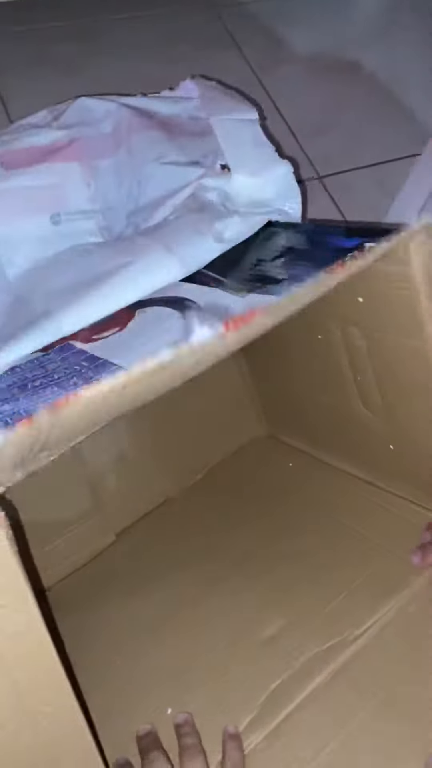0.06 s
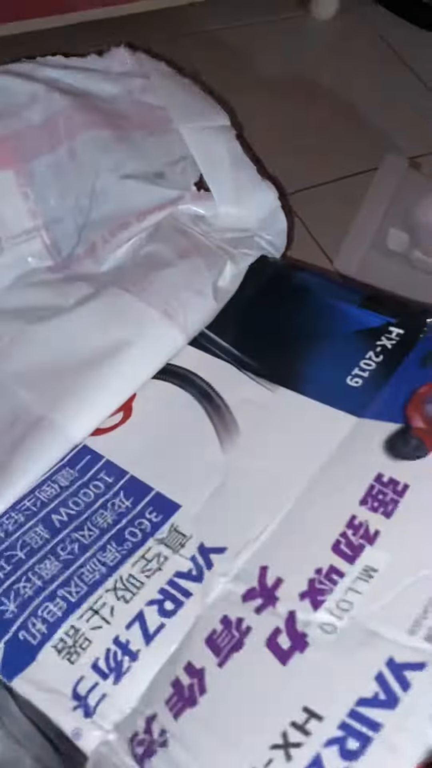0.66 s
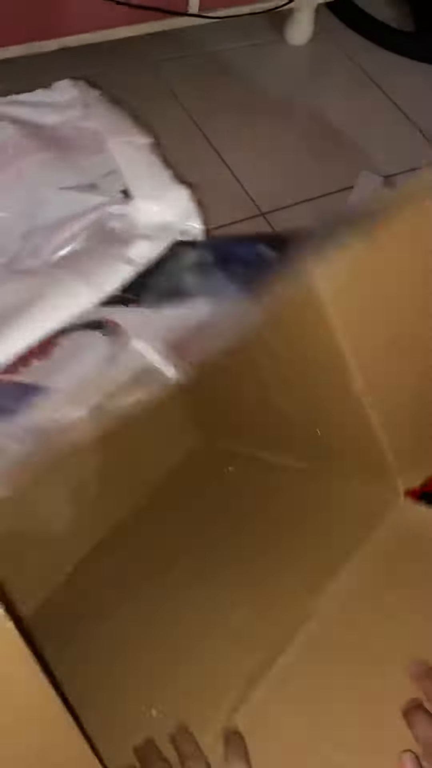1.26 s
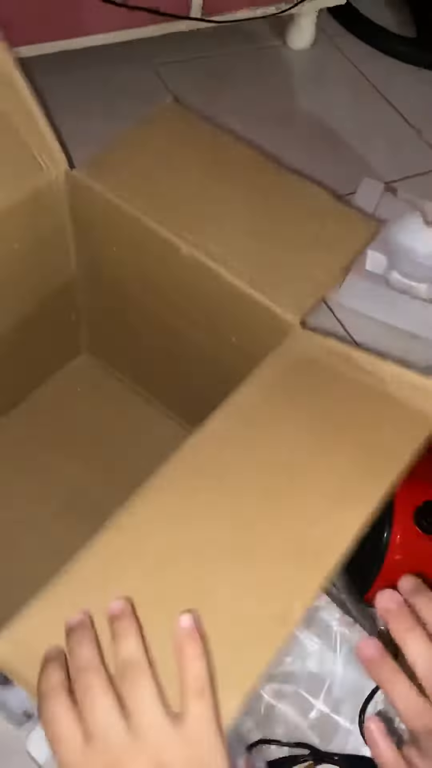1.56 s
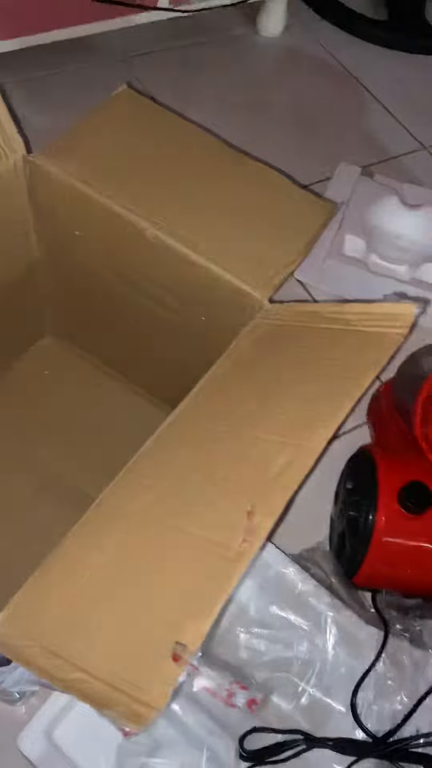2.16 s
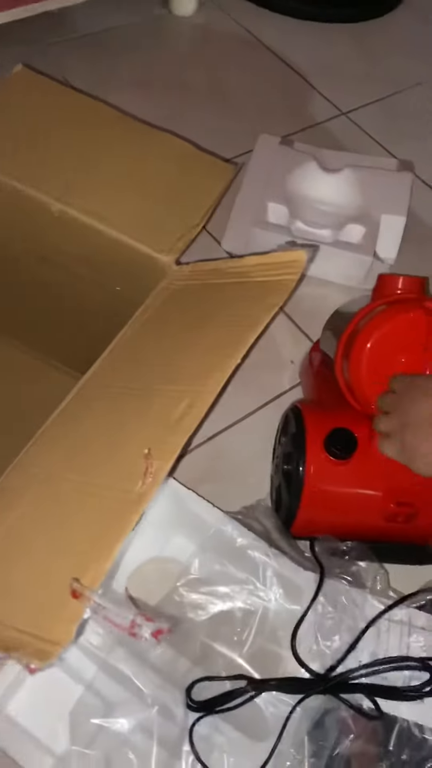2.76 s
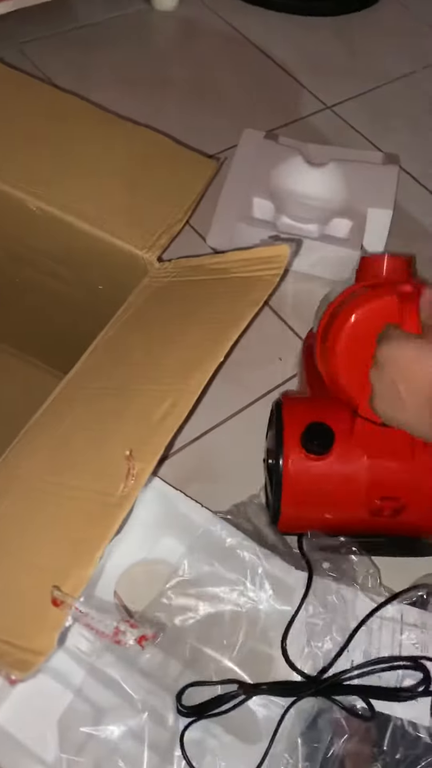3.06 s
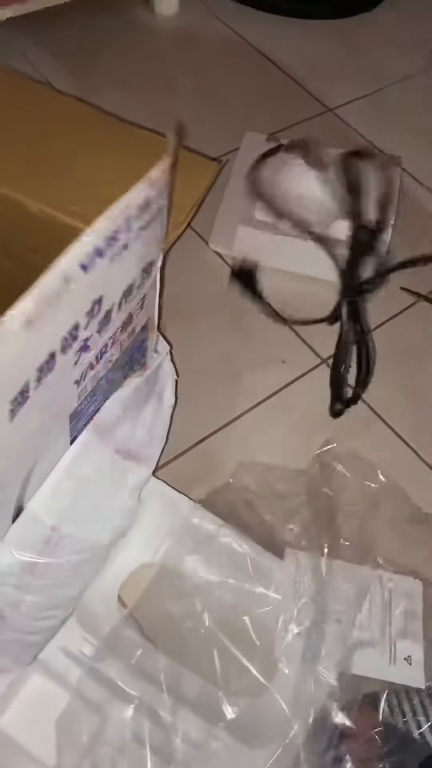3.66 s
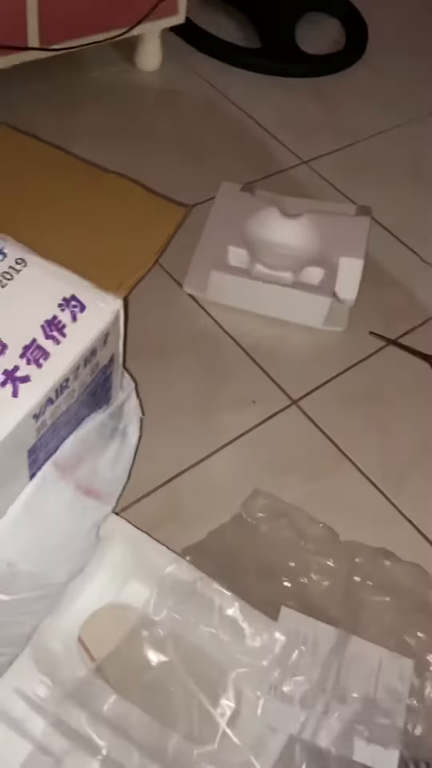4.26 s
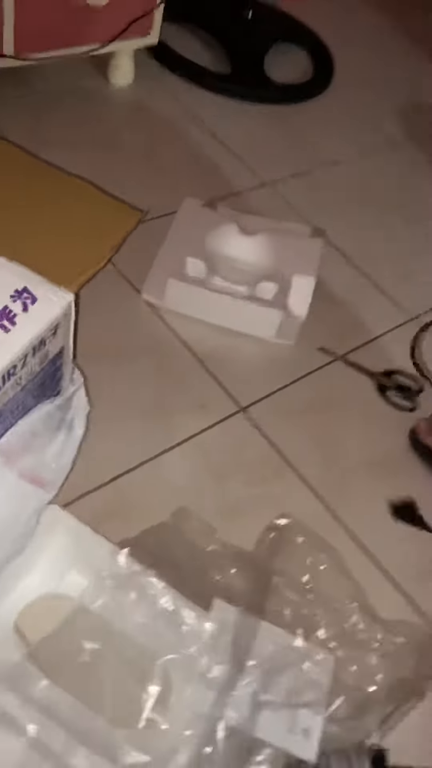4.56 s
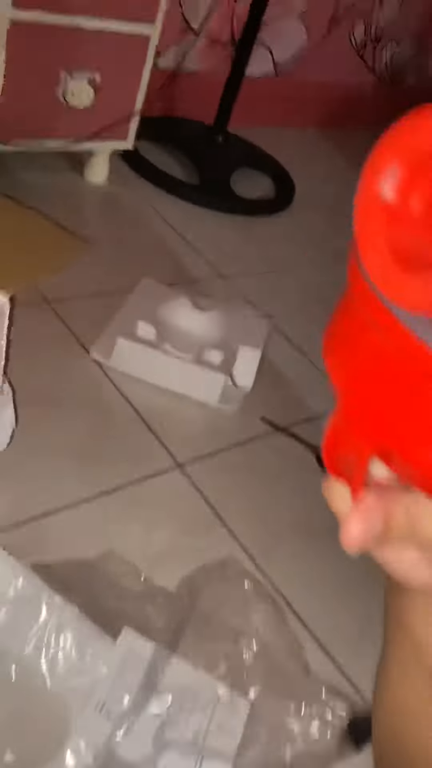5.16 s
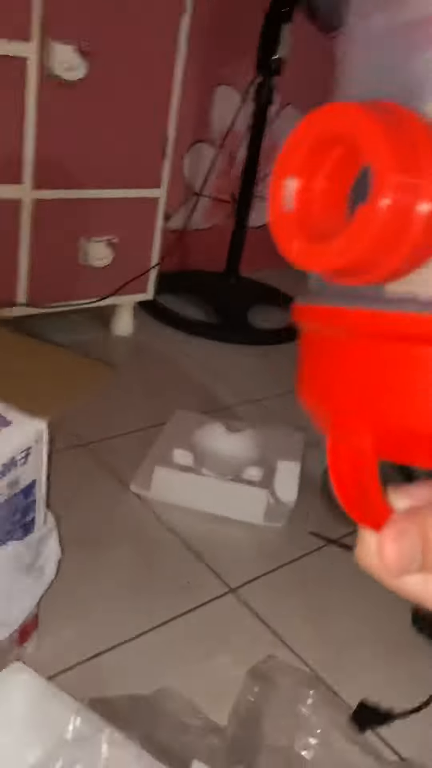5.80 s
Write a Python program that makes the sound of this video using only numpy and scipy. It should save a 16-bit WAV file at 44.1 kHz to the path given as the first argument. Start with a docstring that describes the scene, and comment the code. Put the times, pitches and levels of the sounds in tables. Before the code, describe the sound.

A low motor hum, probably an air conditioner, runs for the whole six seconds, throbbing nearly four times a second with a faint buzz and a steady rush of air. Over it come light, close unpacking noises with the short echo of a small tiled room. In the first second a cardboard flap slides softly, with a few small taps and ticks. From about 1.3 seconds cardboard scrapes, ending in a quick cluster of hollow box knocks at 1.5. After a lull, a plastic vacuum cleaner body taps near 3 seconds, and packing film crinkles with bright snaps until about 3.6, with another box knock at 3.5. Around 4 seconds the box thumps twice more amid further crinkling. Two faint taps follow at about 4.5 and 4.8 seconds, then only the throbbing hum and fan remain.

```python
"""A low, throbbing hum fills a tiled room while someone unpacks a vacuum cleaner on the floor.
The hum is a motor, probably an air conditioner's, that slips a little behind the mains and so throbs.
Its fan blows steadily, and every turn puffs out some hiss. Over this, cardboard flaps slide and knock,
packing film crinkles as it buckles, and the cleaner's plastic body taps as it is lifted."""
import sys
import numpy as np
from scipy import signal
from scipy.fft import rfft, irfft
from scipy.io import wavfile
from scipy.ndimage import uniform_filter1d

SR = 44100
rng = np.random.default_rng(int(sys.argv[2]) if len(sys.argv) > 2 else 0)


def dump_mix(stems):
    """Bounce the given channels to the path in sys.argv[1] as a 16-bit WAV at rate SR."""
    frames = np.atleast_2d(stems).T  # one column per channel
    limited = np.clip(frames, -1, 1)  # hard clip at full scale
    pcm = np.round(limited * 32767).astype(np.int16)
    wavfile.write(sys.argv[1], SR, pcm)


N = 266099
TIME = np.arange(N) / SR
FREQ = np.fft.rfftfreq(2 ** 19, 1 / SR)


def from_db(db):
    """Turn decibels into a number to multiply a sound by."""
    return 10 ** (np.asarray(db) / 20)


def normalize(x):
    """Scale to an average power of 1."""
    return x / np.sqrt(np.mean(x ** 2))


def over_time(rows):
    """Join (time_s, value) rows with straight lines."""
    return np.interp(TIME, *np.transpose(rows))


def level_change(rows):
    """How many dB a level lies above or below its own average at each moment."""
    db = over_time(rows)
    return db - db.mean()


def over_pitch(rows):
    """Join (pitch_hz, value) rows, giving every octave the same width."""
    hz, value = np.transpose(rows)
    return np.interp(np.log(FREQ + 1), np.log(hz), value)


def filtered(x, gain):
    """Turn each frequency up or down by its own gain."""
    return irfft(rfft(x, 2 * (len(FREQ) - 1)) * gain)[..., :N]


def tint(x, rows):
    """Colour a sound by (pitch_hz, level_db) rows; white noise keeps its power."""
    return filtered(x, normalize(from_db(over_pitch(rows))))


def resonate(x, hz, q):
    """Keep the sound near one pitch; a higher q keeps a narrower band."""
    return signal.lfilter(*signal.iirpeak(min(hz, .4 * SR), max(q, .7), fs=SR), x)


def wander(rate_hz):
    """A smooth random wobble, roughly 1 in size."""
    step = int(SR / rate_hz)
    stairs = np.repeat(rng.standard_normal(N // step + 1), step)
    return 1.3 * uniform_filter1d(uniform_filter1d(stairs, step), step)[:N]


def tone(cycles, db):
    """A pure tone whose average power is db."""
    return np.sqrt(2) * from_db(db) * np.cos(2 * np.pi * cycles)


def burst(rise_s, decay_s):
    """The noise of one contact: it rises and dies away."""
    t = TIME[:SR // 4]
    envelope = (1 - np.exp(-t / rise_s)) * np.exp(-t / decay_s)
    return rng.standard_normal(len(t)) * envelope / envelope.max()


def gesture(peak_s, hold_s, rise_s, fall_s):
    """The strength of a movement: it builds until peak_s, holds, then fades."""
    since = TIME - peak_s
    return np.exp(np.minimum(since, 0) / rise_s - np.maximum(since - hold_s, 0) / fall_s)


def scatter(activity, db, hz, count):
    """Random (start_s, level_db, pitch_hz) contacts, likeliest where activity is high."""
    when, softness, pitch = rng.random((count, 3)).T
    times = np.interp(when, np.cumsum(activity) / np.sum(activity), TIME)
    return list(zip(times, db - 6 * softness, hz * 2 ** (pitch - .5)))


def add(track, start_s, sound):
    """Mix a sound into a track."""
    start = max(int(start_s * SR), 0)
    track[start:start + len(sound)] += sound[:N - start]


# The fan's rush, from bass to treble: pitch_hz, level_db_per_hz
RUSH_COLOUR = [(22, -100), (40, -68), (150, -68.5), (215, -70.5), (285, -70), (450, -71), (600, -77.5),
               (850, -76.5), (1250, -82), (1700, -85), (3000, -90.5), (5300, -108.5), (12000, -102.4),
               (15500, -111.4)]
# How alike the rush is on the left and right: pitch_hz, likeness (0 to 1)
RUSH_LIKENESS = [(100, 1), (300, .96), (520, .75), (750, .3), (1250, .3), (1900, .6), (2700, .2),
                 (4400, .2), (5300, .5), (12000, .35)]
# Two resonances of the rush come and go as the microphone moves: time_s, boost_db
LOWER_PEAK_BOOST = [(0, -.8), (2.2, 0.5), (3.2, -1), (4.7, -0.5), (5.25, 2.5), (6.03, 2)]
UPPER_PEAK_BOOST = [(0, -.5), (1.6, -0.3), (2.3, 2), (3.8, 1), (4.8, -1.5), (6.03, -1)]
# So do the upper rush and the room's boom (only the change is used, scaled): time_s, level_db
UPPER_RUSH_DRIFT = [(0.0, -48.5), (1.54, -47.5), (1.9, -49.5), (3.21, -49), (3.41, -47.5), (4.32, -48),
                    (4.79, -52), (6.03, -50)]
ROOM_BOOM_DRIFT = [(0.0, -52), (0.34, -50), (0.74, -49), (1.29, -51), (4.97, -50.5), (6.03, -48)]
def fan(flicker_db=1.24, boom_hz=255, lower_peak_hz=900, upper_peak_hz=1750):
    """Rushing air, alike on both sides in the bass and less so higher up."""
    likeness = np.sqrt(np.clip(over_pitch(RUSH_LIKENESS), 0, 1))
    gain = from_db(over_pitch(RUSH_COLOUR)) * np.sqrt(SR / 2)
    shared = filtered(rng.standard_normal(N), gain * np.sqrt((1 + likeness) / 2))
    side = filtered(rng.standard_normal(N), gain * np.sqrt((1 - likeness) / 2))
    rush = np.array([shared + side, shared - side])
    for hz, boost in (lower_peak_hz, LOWER_PEAK_BOOST), (upper_peak_hz, UPPER_PEAK_BOOST):
        rush = rush + resonate(rush, hz, q=4.7) * (from_db(over_time(boost)) - 1)
    # the bass fills the room evenly; these two parts change from place to place
    upper = filtered(rush, FREQ ** 2 / (FREQ ** 2 + 520 ** 2))
    boom = resonate(rush, boom_hz, q=2.5)
    upper_db = .99 * level_change(UPPER_RUSH_DRIFT) + flicker_db * wander(40)
    boom_db = 2.1 * level_change(ROOM_BOOM_DRIFT)
    return rush + upper * (from_db(upper_db) - 1) + boom * (from_db(boom_db) - 1)


SHAFT_HZ, MAINS_HZ = 58.072, 59.911
STROKE_PEAK_S, THROB_PEAK_S = .014, .084  # one peak of the motor's stroke, one of its throb

# The hiss of the motor's strokes: pitch_hz, level_db
HISS_COLOUR = [(2000, 10.0), (4000, 7.5), (5300, 6.5), (7000, -0.5), (10500, -1.0), (15500, -15)]
def motor_hiss(hiss_db=-54.5, chatter_db=-59, chatter_hz=1750):
    """A hiss swells after each working stroke, with a faint chatter twice a turn."""
    turn = (SHAFT_HZ * (TIME - STROKE_PEAK_S) - .22) % 1  # runs from 0 to 1 every turn
    swell = .4 + np.exp(-turn / .2) * (1 - np.exp(-turn / .08))
    hiss = tint(rng.standard_normal(N) * swell, HISS_COLOUR)
    pulses = np.exp(-((2 * turn - .1) % 1) / .24)
    chatter = resonate(rng.standard_normal(N) * pulses, chatter_hz, q=3.7)
    drift = from_db(.43 * level_change(UPPER_RUSH_DRIFT))
    return (from_db(hiss_db) * normalize(hiss) + from_db(chatter_db) * normalize(chatter)) * drift


# The casing's buzz; each pitch is a shaft multiple plus a mains multiple:
# shaft_multiple, mains_multiple, level_db
BUZZ_TONES = [(3, 0, -60), (5, 0, -52.5), (6, 0, -62), (9, 0, -65.5), (10, 0, -62.5), (11, 0, -66.5),
              (16, 0, -70.5), (17, 0, -70.5), (19, 0, -69), (24, 0, -71), (26, 0, -69.5), (0, 6, -72),
              (20, 2, -68), (26, 2, -67.5), (29, 2, -85), (31, 2, -70.5)]
# The throb and the low buzz change as the microphone moves: time_s, boost_db
THROB_BOOST = [(0, 0.8), (2, 0.4), (3.6, 0), (5.2, -1.2), (6.03, -0.2)]
LOW_BUZZ_BOOST = [(0, -1), (.7, 0), (1.5, -3), (2.2, 0), (3.2, 0), (3.8, -1.5), (4.4, 1), (5.3, 1),
                  (6.03, -1.5)]
# So does the casing's drone: time_s, level_db
CASING_DRONE = [(0, -50), (.7, -48.5), (1.4, -50.5), (1.9, -46.5), (2.2, -45), (2.75, -47.5), (3.15, -46),
                (4.35, -45.5), (4.95, -47), (5.4, -50), (5.75, -46), (6.03, -46)]
def motor_hum(shaft_db=-28.5, twice_shaft_db=-39, magnet_db=-38.5, rumble_hz=93.8, rumble_db=-50):
    """Two close tones, twice the shaft rate and twice the mains, throb over a deep hum and a buzz."""
    turns = SHAFT_HZ * (TIME - STROKE_PEAK_S) + .002 * wander(4)
    mains_cycles = turns + (MAINS_HZ - SHAFT_HZ) * (TIME - THROB_PEAK_S)  # the mains pull ahead
    dip_db = -4.5 * np.exp(-((TIME - 3.395) / .028) ** 2)  # the deep hum dips briefly
    hum = tone(turns, shaft_db + dip_db + .21 * wander(24))
    # the throbbing pair; a quarter-cycle shift makes the stroke lopsided
    for cycles, db in (turns, twice_shaft_db), (mains_cycles, magnet_db):
        hum += tone(2 * cycles + 1 / 4, db + over_time(THROB_BOOST) + .7 * wander(6))
    hum += tone(7 * turns + rng.random(), over_time(CASING_DRONE))
    low_db, high_db = over_time(LOW_BUZZ_BOOST), level_change(UPPER_RUSH_DRIFT)
    for shaft, mains, db in BUZZ_TONES:
        # the high tones fade and return with the fan's upper rush
        boost_db = .5 + (high_db if shaft * SHAFT_HZ > 800 else low_db)
        cycles = shaft * turns + mains * mains_cycles + rng.random()
        hum += tone(cycles, db + boost_db + 1.5 * wander(3.85))
    fan_rumble = resonate(resonate(rng.standard_normal(N), rumble_hz, q=9.3), rumble_hz, q=9.3)
    return hum + from_db(rumble_db) * normalize(fan_rumble)


# The sound of cardboard rubbing on cardboard: pitch_hz, level_db
SCRAPE_COLOUR = [(200, -11), (700, -12), (1500, 5.5), (2800, 0.5), (4200, 1.5), (6000, 0), (9000, -1.5),
                 (12000, 0.5), (14500, -7.5)]
# Each slide (a light, fast swish has little body): peak_s, rise_s, fall_s, level_db, body_db
FLAP_SLIDES = [(.18, 0.057, 0.024, -47.5, -21), (.27, 0.028, 0.12, -48.5, 5.5),
               (1.272, 0.028, 0.015, -44, 7.5), (1.443, 0.083, 0.025, -40, -3),
               (1.535, 0.011, 0.17, -47.5, 2.5), (4.131, 0.0095, 0.0062, -43.5, 12.5)]
def cardboard_slides(roughness=.27, body_hz=1700):
    """Dry paper fibres catch and let go in one scrape; under pressure the panel sounds along."""
    catches = rng.standard_normal(N) * np.exp(roughness * rng.standard_normal(N))
    grip_db = 2.4 * wander(450) + 1.2 * wander(70)
    scrape = tint(normalize(catches * from_db(grip_db)), SCRAPE_COLOUR)
    panel = resonate(scrape, body_hz, q=.7)
    out = np.zeros(N)
    for peak_s, rise_s, fall_s, db, body_db in FLAP_SLIDES:
        strength = from_db(db) * gesture(peak_s, 0, rise_s, fall_s)
        out += strength * (scrape + (from_db(body_db) - 1) * panel)
    return out


# The cleaner and its cord drag the packing film: start_s, length_s, level_db
FILM_DRAGS = [(0.26, 0.062, -58), (3.112, 0.052, -48.5), (3.235, 0.055, -43.5), (3.312, 0.049, -50),
              (3.444, .04, -45), (3.506, .024, -42), (4.032, 0.16, -50)]
def film_motion(rise_s=.018, stop_s=.015, settle_s=.22, settle_db=-24):
    """How hard the film moves: it gives way quickly, stops, then goes on settling faintly."""
    motion = np.zeros(N)
    for start_s, length_s, db in FILM_DRAGS:
        drag = gesture(start_s, length_s, rise_s, stop_s)
        settling = from_db(settle_db) * gesture(start_s, length_s, rise_s, settle_s)
        motion += from_db(db) * (drag + settling)
    return motion


# The sound of crinkling film: pitch_hz, level_db
CRINKLE_COLOUR = [(200, -12), (700, -9), (1500, -6.5), (2800, -7), (4200, -6.5), (6000, -3.5),
                  (9000, -10.5), (12000, -6), (14500, -14)]
def film_crinkle(buckles_per_s=650, ring_s=.0009):
    """Thin plastic buckles in many tiny places; most buckles are small, a few are large."""
    sizes = from_db(4.6 * np.minimum(rng.exponential(size=N), 3.5))
    buckles = sizes * (rng.random(N) < buckles_per_s / SR)
    energy = signal.lfilter([1], [1, -np.exp(-1 / (ring_s * SR))], buckles ** 2)  # each one fades
    crackle = normalize(np.sqrt(energy) * rng.standard_normal(N))
    return tint(crackle * film_motion(), CRINKLE_COLOUR)


# Single snaps of film and tape: start_s, strength_db, pitch_hz
CREASE_SNAPS = [(.263, -41, 8000), (.327, -41, 8500), (.532, -44, 9000), (1.178, -40.5, 9500),
                (1.182, -43, 9500), (2.968, -44, 5200), (3.011, -38.5, 7500), (3.117, -43, 9000),
                (3.134, -40, 10000), (3.224, -41, 7000), (3.256, -27.5, 12500), (3.261, -31, 11500),
                (3.273, -35, 6000), (3.279, -38, 7000), (3.286, -39, 8000), (3.443, -35.5, 7600),
                (3.458, -36.5, 6500), (3.463, -36, 6000), (3.494, -34, 6500), (3.552, -37, 7500),
                (3.69, -45, 9000), (4.015, -45, 9000), (4.021, -43, 9000), (4.037, -43, 11000),
                (4.059, -38, 7100), (4.062, -36.5, 7100), (4.083, -40, 7500), (4.089, -40, 9500),
                (4.104, -39, 8000), (4.138, -32.5, 9000), (4.245, -37.5, 12500), (4.302, -45, 7000)]
def film_snaps(edge_db=-12):
    """A crease flips over with a bright tick; fainter ones come by chance while the film moves."""
    out = np.zeros(N)
    faint = scatter(film_motion() ** 2, db=-44, hz=7500, count=14)
    for start_s, db, hz in CREASE_SNAPS + faint:
        flip = 2.2 * burst(rise_s=.00015, decay_s=.0011)
        tick = resonate(flip, hz, q=1.4)
        add(out, start_s, from_db(db) * (tick + from_db(edge_db) * flip))
    return out


# Taps of fingers, flaps and the plastic body: start_s, strength_db, main_pitch_hz, second_pitch_hz
LIGHT_TAPS = [(.15, -34, 970, 2000), (0.433, -33, 840, 2130), (.568, -29.5, 2480, 1180),
              (0.71, -37, 1340, 900), (1.536, -33, 1640, 1100), (1.633, -34, 2050, 1000),
              (1.685, -38, 1700, 900), (2.76, -36, 900, 1290), (2.969, -28.5, 636, 1040),
              (3.352, -28.5, 1020, 640), (3.815, -31.5, 1250, 2530), (3.97, -35.5, 1210, 1640),
              (4.126, -34, 2320, 1100), (4.137, -32, 1700, 1090), (4.459, -32, 1580, 2200),
              (4.778, -37, 2800, 5200)]
def light_taps(second_db=-4, scuff_db=-3, treble_cut_hz=5500, hands_busy_until_s=4.1):
    """Each touch on a dull panel clicks, then rings and scuffs very briefly at two pitches."""
    out, t = np.zeros(N), TIME[:SR // 4]
    touches = scatter(TIME < hands_busy_until_s, db=-43, hz=1400, count=9)
    faint = [(start_s, db, hz, hz / 2) for start_s, db, hz in touches]
    for start_s, db, main_hz, second_hz in LIGHT_TAPS + faint:
        contact = burst(rise_s=.0005, decay_s=.005)
        click = burst(rise_s=.0003, decay_s=.003)
        add(out, start_s, from_db(db - 6) * click)
        for hz, ring_db in (main_hz, 0), (second_hz, second_db):
            ring = .6 * np.sin(2 * np.pi * hz * t) * np.exp(-t / .0015)
            scuff = resonate(resonate(contact, hz, q=1.1), hz, q=1.1) * np.sqrt(SR / 4 / hz)
            add(out, start_s, from_db(db + ring_db) * (ring + from_db(scuff_db) * scuff))
    # soft contacts carry little treble
    return signal.sosfilt(signal.butter(2, treble_cut_hz, fs=SR, output="sos"), out)


# The notes the empty box rings at: part, pitch_hz, level_db, fade_s (time to fall by 60 dB)
BOX_NOTES = [("floor", 182, 0, .08), ("panel", 276.7, 0, 0.083), ("hollow", 396, 0, 0.065),
             ("hollow", 452, -8.5, 0.062), ("edge", 697, -6.5, 0.024), ("edge", 810, 0, 0.019),
             ("edge", 860, -20, .2), ("edge", 1030, -9, 0.025), ("edge", 1150, -15, .02),
             ("edge", 1900, -15, .018)]
# The slap of a cardboard edge: pitch_hz, level_db
EDGE_SLAP_COLOUR = [(120, 5), (400, 5), (560, -4), (730, 10), (900, 6), (1200, -6), (2200, 1), (3500, -4.5),
                    (6000, -6), (11000, -11.5), (15500, -26)]
# Knocks on the box; where one lands decides how strongly each part sounds:
# start_s, slap_db, edge_db, floor_db, panel_db, hollow_db, boom_delay_s, pitch_factor, puff_db
BOX_KNOCKS = [(.163, -52, -50, -36, -46, -48, .002, 1.03, -46),
              (1.520, -44, -48, -29.5, -26.5, -40, 0, 1.03, -46),
              (1.524, -33, -26, -36, -42, -36, 0, 1.03, -46),
              (1.531, -37, -34, -36, -29.5, -44, .004, .72, -21),
              (1.564, -50, -48, -40, -37, -42, .004, .97, -27),
              (1.584, -55, -52, -42, -44, -46, .003, .92, -29),
              (3.376, -55, -52, -37, -46, -48, .002, 1.07, -42),
              (3.494, -33, -30, -33, -29, -28, .001, 1.02, -48),
              (3.520, -40, -42, -38, -38, -33, .002, 1.06, -50),
              (3.968, -38, -37, -36, -24.5, -36, .0045, .98, -52),
              (4.087, -42, -38, -55, -52, -50, .002, 1, -60),
              (4.124, -35, -38, -43, -21.5, -24.5, .006, 1, -48)]
def box_knocks(wall_rise_s=.0022, edge_rise_s=.00047, puff_hz=83):
    """The edge slaps and clacks, the walls boom a moment later, and the flap pushes out a puff of air."""
    slaps, booms, t = np.zeros(N), np.zeros(N), TIME[:SR // 4]
    puff = t / .009 * np.exp(1 - t / .009) * np.sin(2 * np.pi * puff_hz * t)
    for start_s, slap_db, edge_db, floor_db, panel_db, hollow_db, delay_s, pitch, puff_db in BOX_KNOCKS:
        add(slaps, start_s, from_db(slap_db) * burst(rise_s=.0004, decay_s=.009))
        part_db = {"edge": edge_db, "floor": floor_db, "panel": panel_db, "hollow": hollow_db}
        for part, hz, db, fade_s in BOX_NOTES:
            wait_s, rise_s = (0, edge_rise_s) if part == "edge" else (delay_s, wall_rise_s)
            envelope = from_db(part_db[part] + db - 60 * t / fade_s) * (1 - np.exp(-t / rise_s))
            add(booms, start_s + wait_s, 2 * envelope * np.sin(2 * np.pi * hz * pitch * t))
        add(booms, start_s, from_db(puff_db) * puff)
    return tint(slaps, EDGE_SLAP_COLOUR) + booms


def tiled_room(x, fade_s=.027, echo_db=-8, bass_cut_hz=450):
    """A small tiled room adds a short, bright wash of echoes, partly shared by left and right."""
    t = TIME[:SR // 2]
    shared, left, right = rng.standard_normal((3, len(t)))
    echoes = (shared + 1.6 * np.array([left, right])) * (t > .004) * from_db(-60 * t / fade_s)
    echoes = signal.sosfilt(signal.butter(2, bass_cut_hz, "highpass", fs=SR, output="sos"), echoes)
    echoes /= np.sqrt(np.sum(echoes ** 2) / 2)
    return x + from_db(echo_db) * signal.fftconvolve(x[None], echoes, axes=1)[:, :N]


def scene():
    """The noises of unpacking echo in the room, over the running motor and its fan."""
    unpacking = cardboard_slides() + film_crinkle() + box_knocks() + light_taps() + film_snaps()
    return tiled_room(unpacking) + fan() + motor_hum() + motor_hiss()


# How far the microphone's right side lags its left: pitch_hz, lag_radians
RIGHT_LAG = [(300, 0.05), (750, 0.25), (1600, -0.37), (2700, 1.05), (4400, 1.03), (5100, 0.19),
             (6000, 1.59), (7000, 3.07), (7900, 3.28), (9800, 6.17), (11200, 6.41), (12900, 9.28),
             (14000, 9.8), (15500, 12.15)]
# How much louder its left side is than its right: pitch_hz, level_db
LEFT_BOOST = [(750, 3), (1290, 3), (2300, -0.5), (4200, -1), (5300, 0.5)]
def record(dry, treble_cut_hz=15600):
    """The microphone's two sides differ in timing and level above the bass, and lose the top treble."""
    above_bass = FREQ ** 4 / (FREQ ** 4 + 480 ** 4)
    lag = above_bass * over_pitch(RIGHT_LAG)
    boost_db = above_bass * over_pitch(LEFT_BOOST)
    left = np.exp(1j * lag / 2) * from_db(boost_db / 2)  # each side takes half, in opposite directions
    stereo = filtered(dry, np.array([left, 1 / left]))
    return signal.sosfilt(signal.ellip(10, .1, 80, treble_cut_hz, fs=SR, output="sos"), stereo)


dry = scene()
out = record(dry)
dump_mix(out)
```